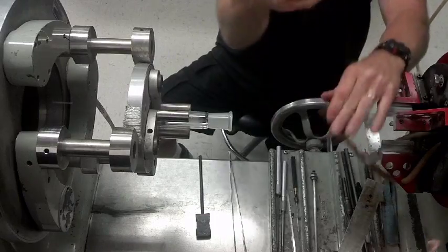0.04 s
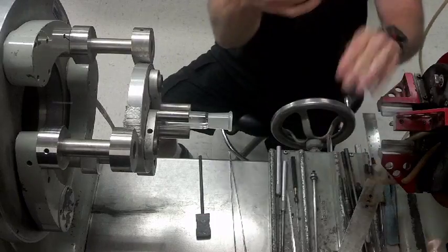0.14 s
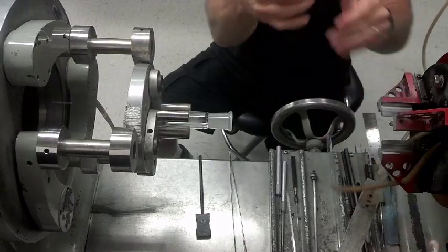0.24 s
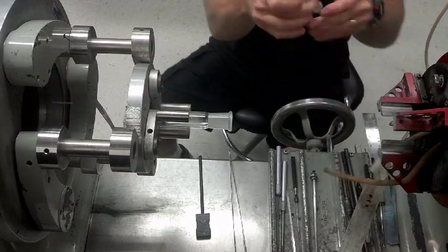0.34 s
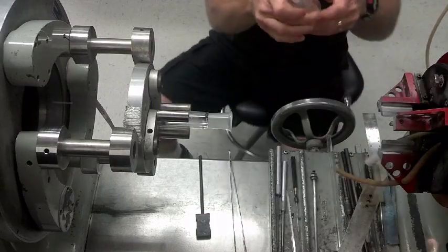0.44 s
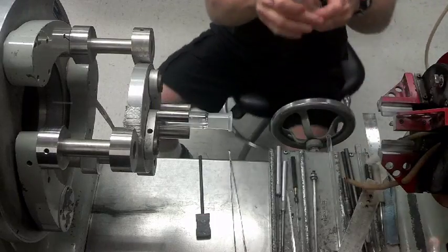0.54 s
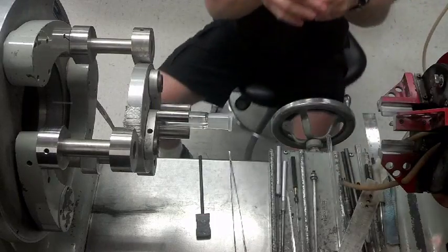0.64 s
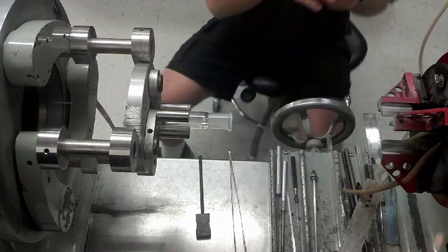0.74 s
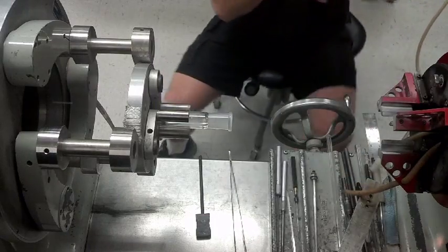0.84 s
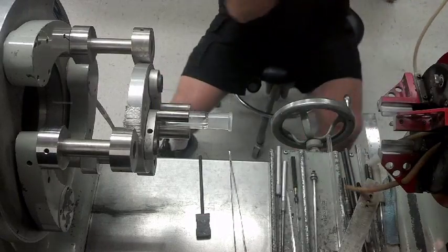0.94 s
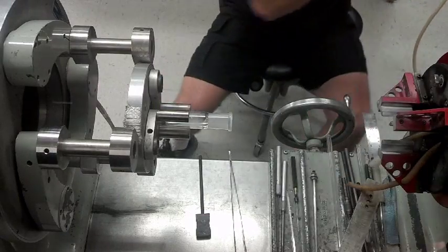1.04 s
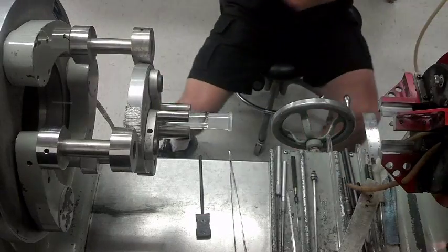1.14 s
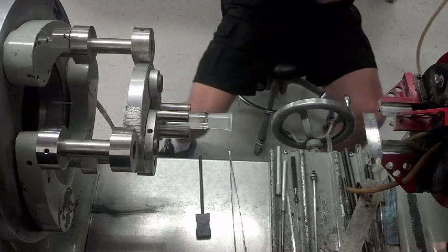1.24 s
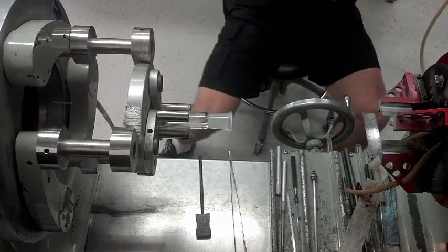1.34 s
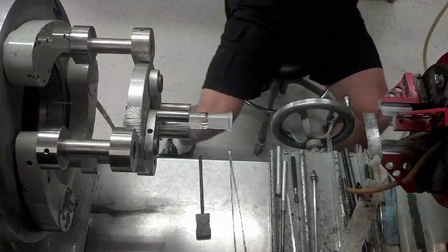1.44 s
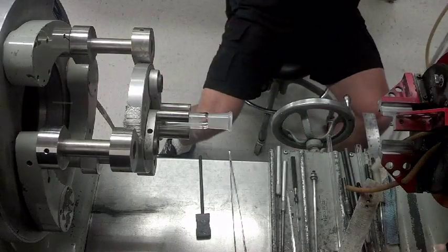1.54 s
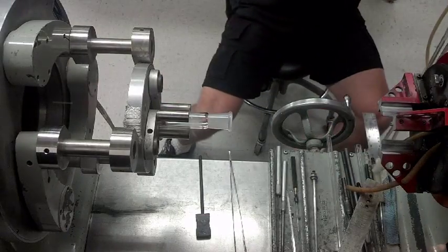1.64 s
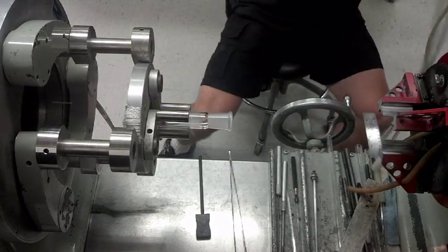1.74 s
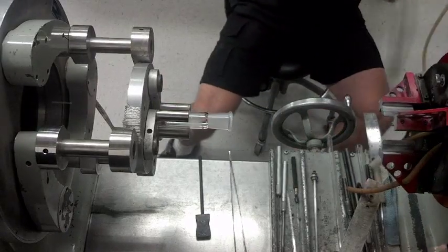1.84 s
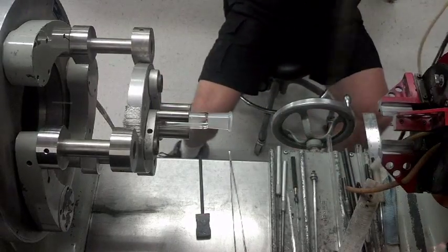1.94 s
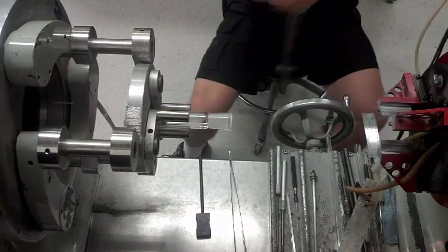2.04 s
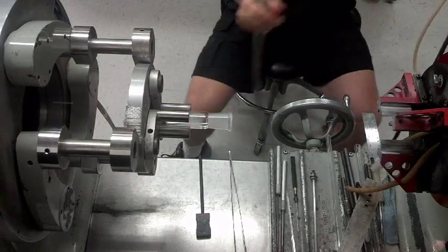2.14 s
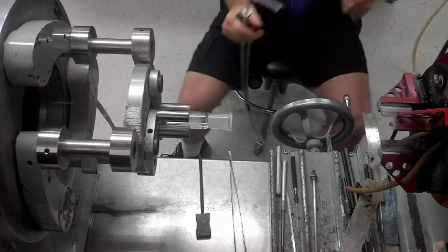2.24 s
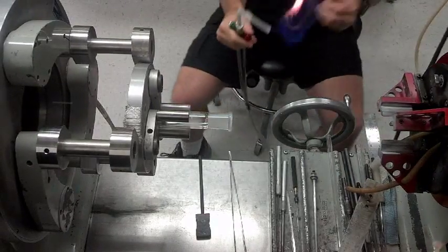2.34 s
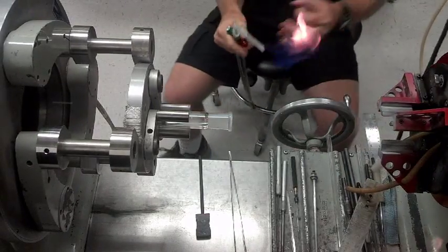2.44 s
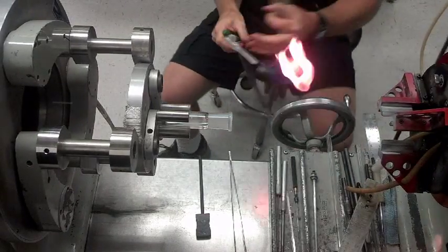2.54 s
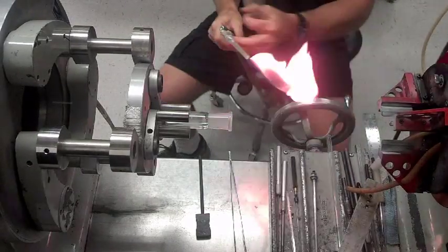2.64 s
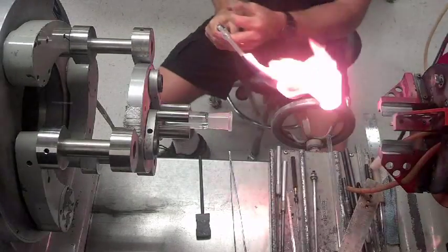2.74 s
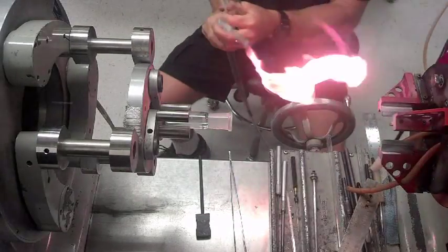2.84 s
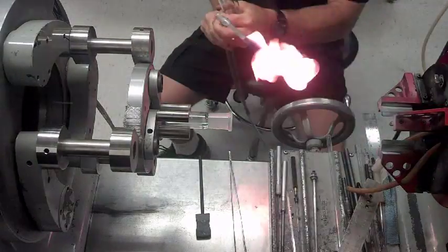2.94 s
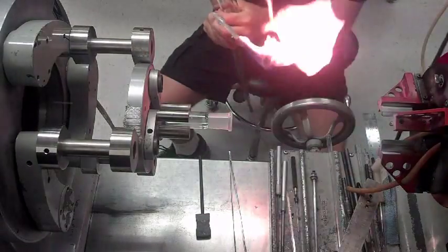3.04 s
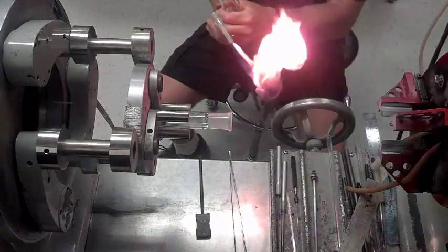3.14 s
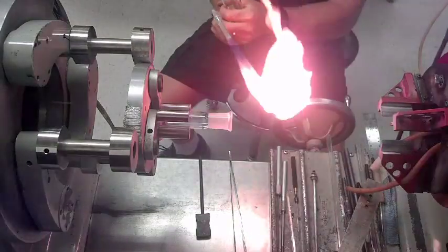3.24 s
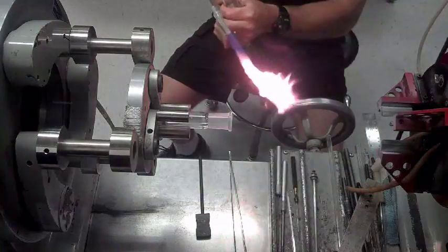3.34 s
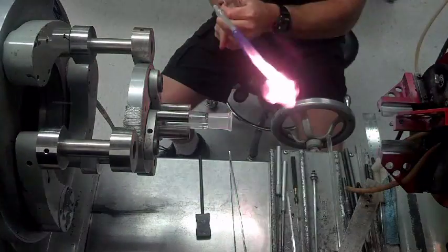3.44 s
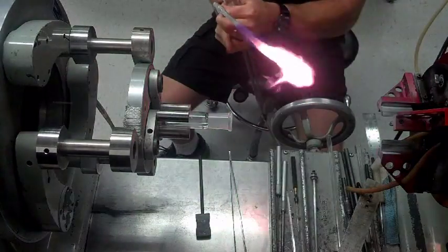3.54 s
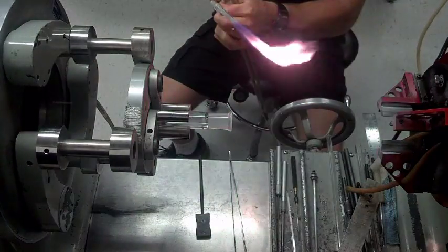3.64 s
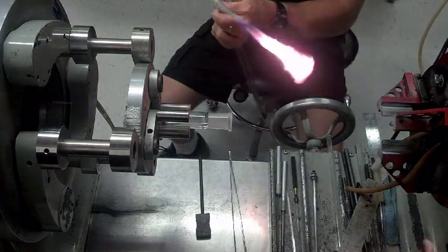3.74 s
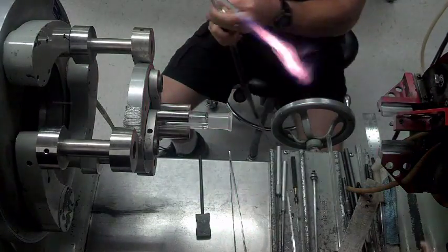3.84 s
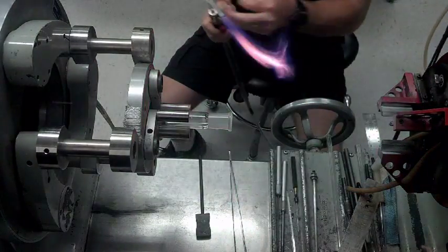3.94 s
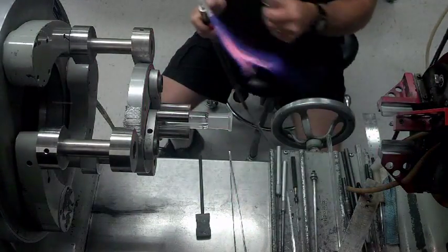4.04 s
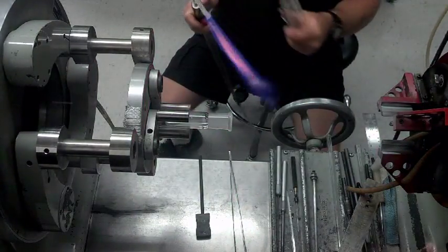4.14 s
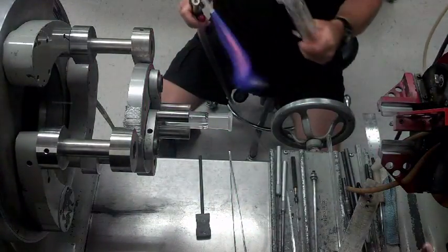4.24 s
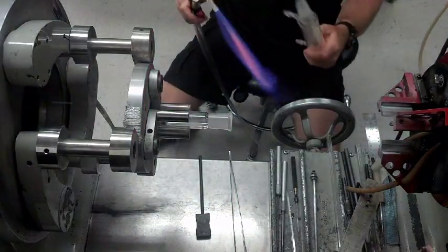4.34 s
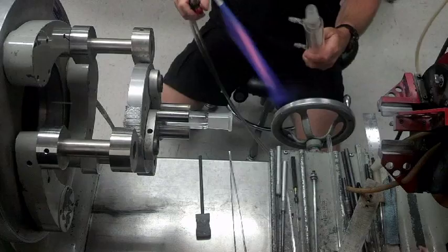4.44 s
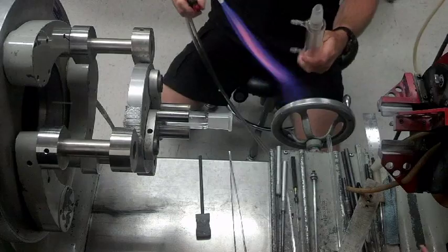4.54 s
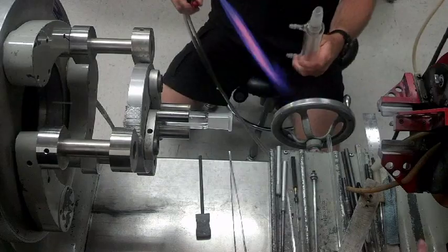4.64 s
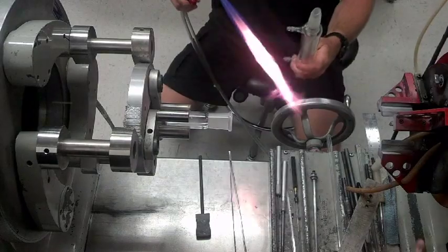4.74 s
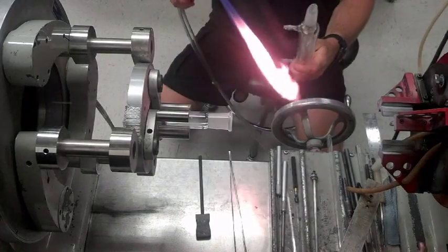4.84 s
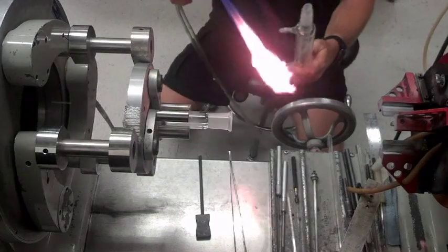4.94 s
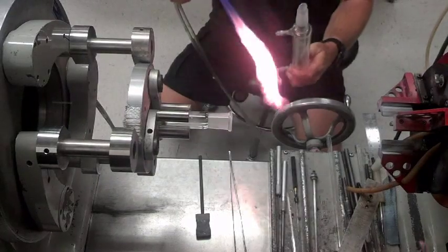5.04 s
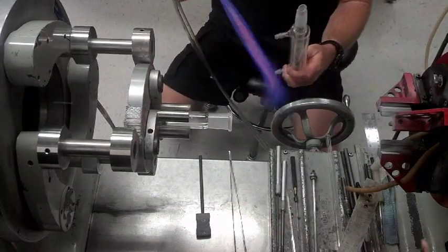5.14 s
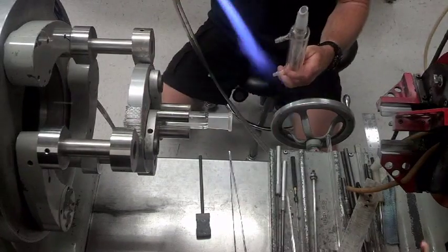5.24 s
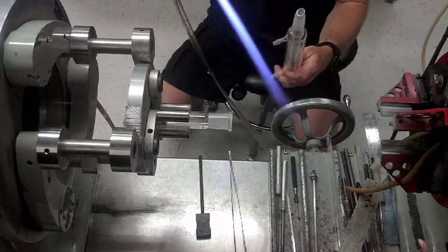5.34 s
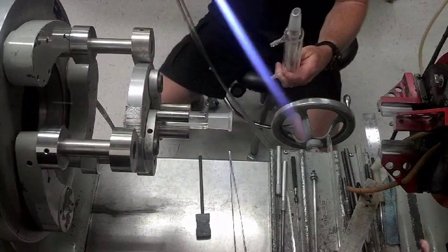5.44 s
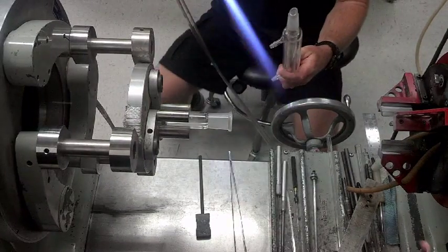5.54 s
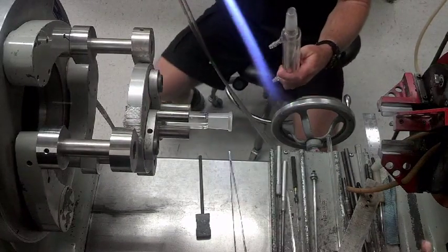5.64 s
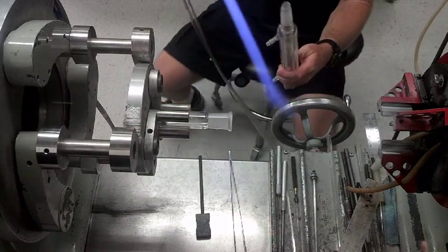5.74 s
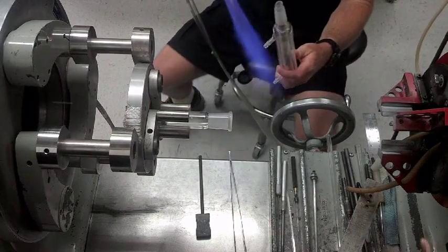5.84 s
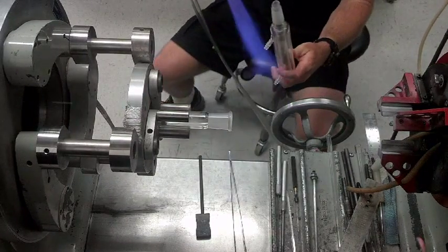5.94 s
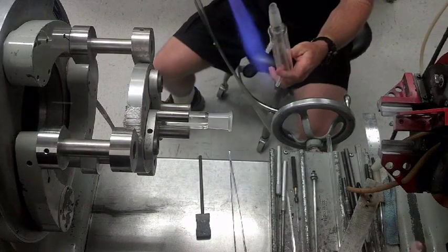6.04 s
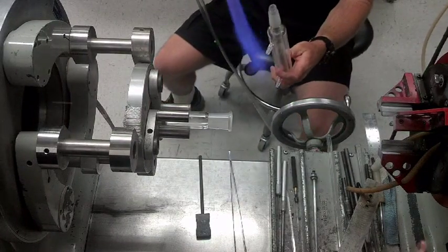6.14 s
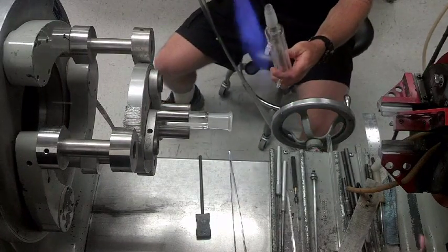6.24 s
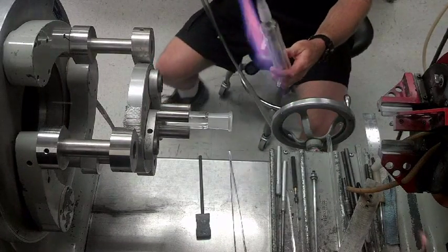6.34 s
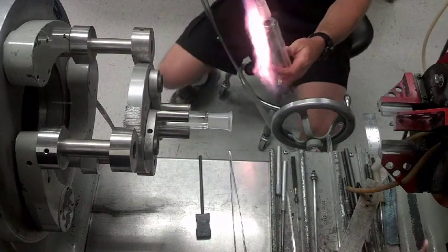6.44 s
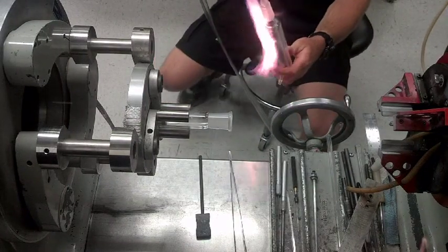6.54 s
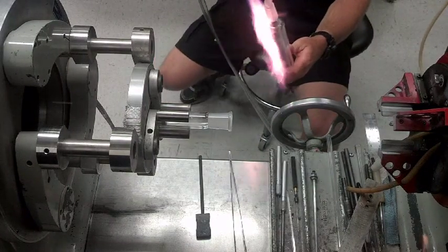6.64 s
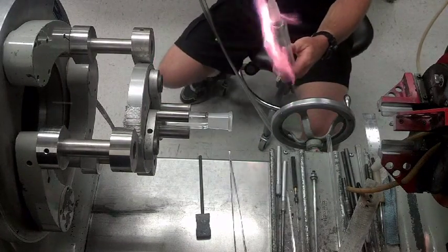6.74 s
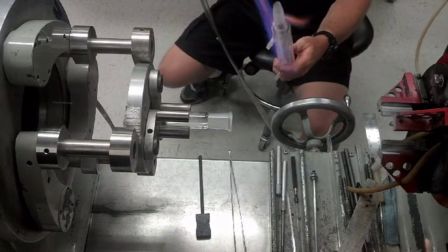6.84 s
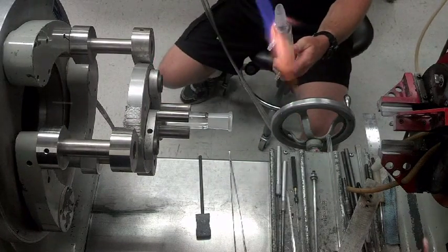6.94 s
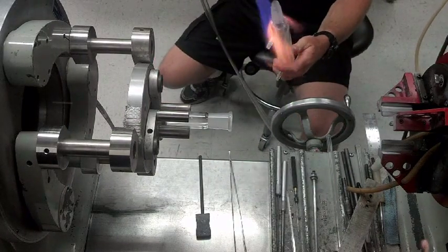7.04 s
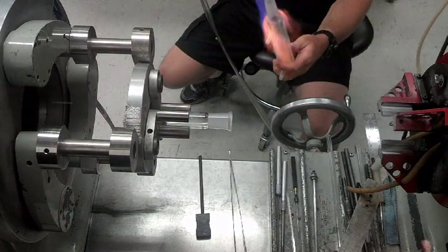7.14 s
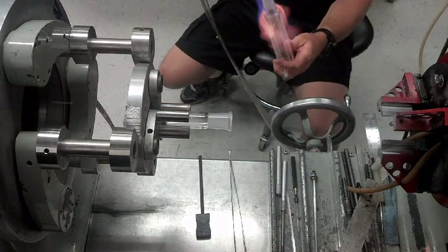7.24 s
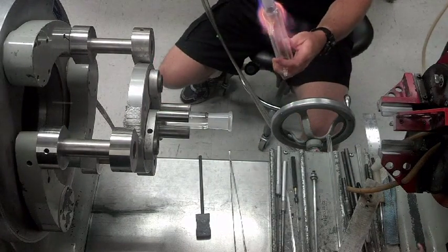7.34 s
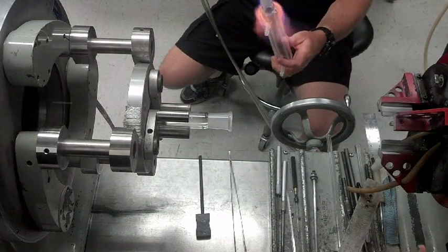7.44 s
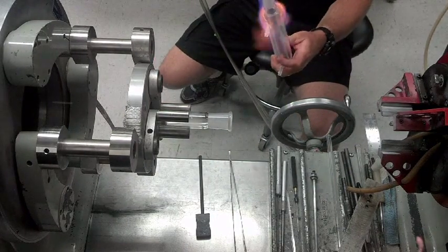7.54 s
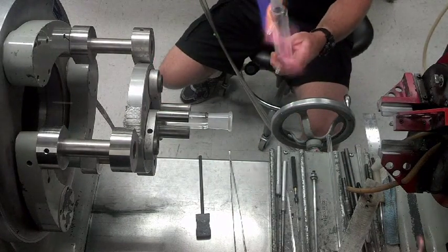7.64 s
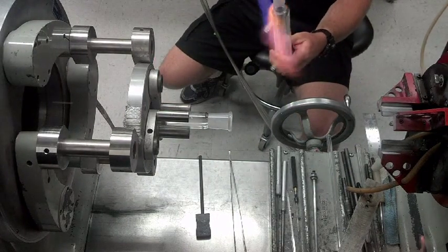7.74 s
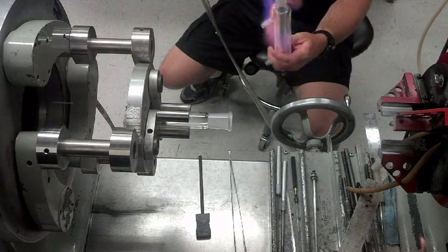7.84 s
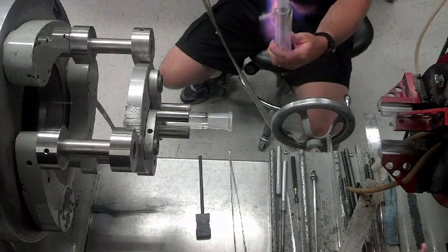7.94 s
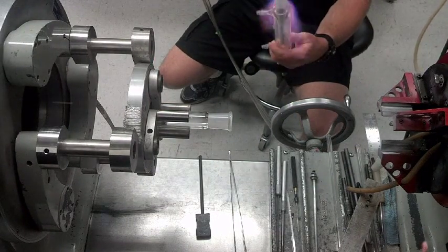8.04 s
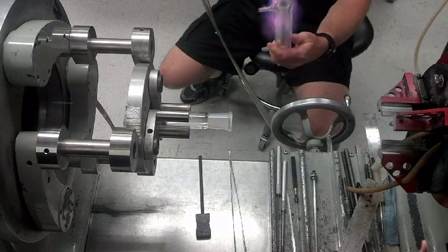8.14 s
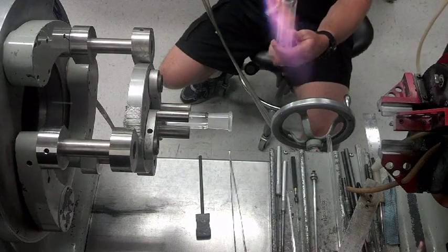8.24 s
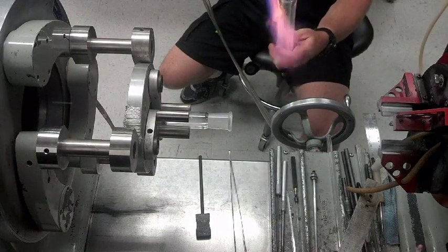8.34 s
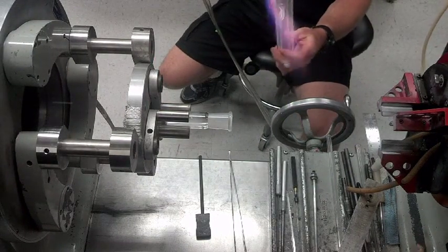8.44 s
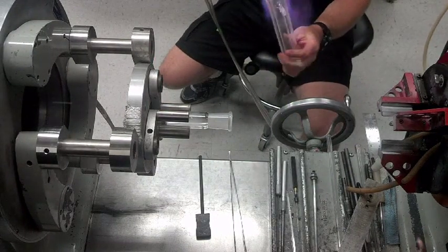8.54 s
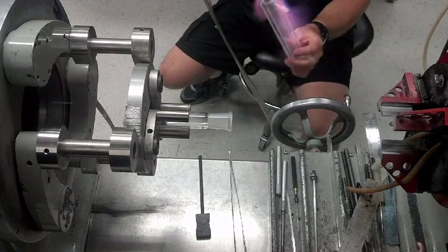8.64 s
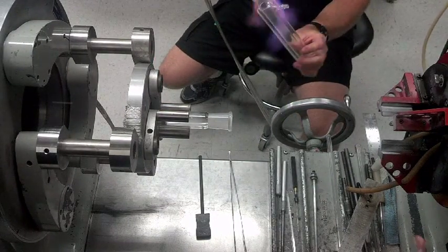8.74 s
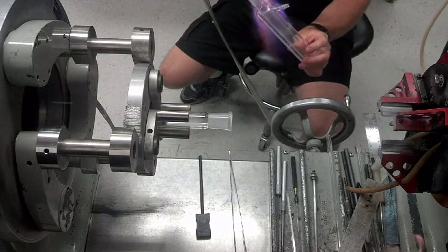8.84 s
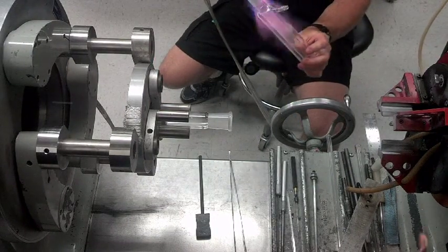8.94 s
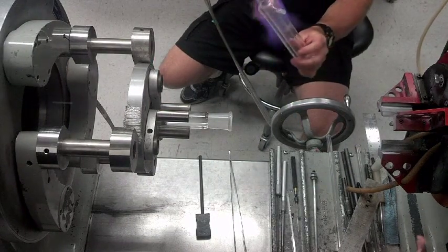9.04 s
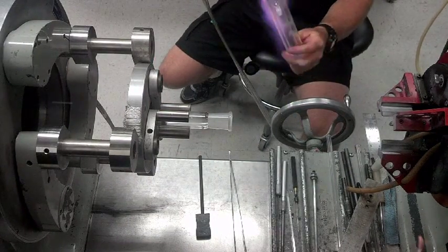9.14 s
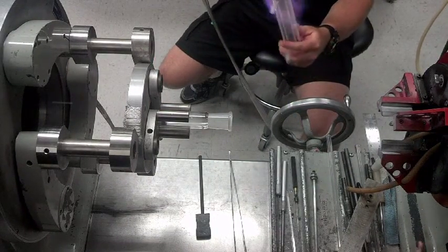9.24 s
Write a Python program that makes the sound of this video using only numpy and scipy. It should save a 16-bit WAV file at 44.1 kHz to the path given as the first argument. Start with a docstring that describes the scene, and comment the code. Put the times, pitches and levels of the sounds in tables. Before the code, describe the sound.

A hand torch hisses steadily over a humming workshop fan, spits once with three small pops, then roars unevenly against a glass tube.

```python
"""A glass workshop: a hand torch burns over a steel bench, under a running extractor fan.
Gas hisses from the nozzle: noise coloured by whistles and by echoes off metal that shift as the torch moves.
As oxygen is turned up the flame spits once, a sputter with three pops, then roars against a glass tube.
The flame is three bands of noise that follow one vigour; the fan is steady noise with duct resonances.
A hollow note sings in the air noise, and there is one soft scuff."""
import sys
import numpy as np
from scipy import signal
from scipy.fft import rfft, irfft, next_fast_len
from scipy.io import wavfile
from scipy.ndimage import uniform_filter1d

SR = 44100
rng = np.random.default_rng(int(sys.argv[2]) if len(sys.argv) > 2 else 0)


def output_pcm(signal):
    """Save a mono or channel-first signal as 16-bit PCM at the path in sys.argv[1].

    Samples are clipped to [-1, 1] before scaling.
    """
    pcm = np.clip(np.atleast_2d(signal).T, -1, 1) * 32767
    wavfile.write(sys.argv[1], SR, np.round(pcm).astype(np.int16))


N = 409248
TIME = np.arange(N) / SR
SIZE = next_fast_len(N, real=True)
HZ = np.maximum(np.arange(SIZE // 2 + 1) * SR / SIZE, 1)   # kept above zero for the logarithms


def jet():
    """Turbulent gas hisses from the nozzle, combed by close echoes; its top flutters more than its body."""
    # Spectrum of the hiss. Each row: frequency in Hz, relative density in dB per Hz.
    hiss_spectrum = [(2300, -6.0), (2750, -2.3), (3500, -3.1), (4400, -1.7), (5150, 0.0), (5800, -3.6),
                     (6400, -3.9), (7000, -1.9), (7700, -2.4), (8400, -6.0), (10000, -6.2), (11500, -10.0),
                     (12700, -7.7), (13400, -11.7)]
    # Faint whistling resonances, torch held still and then by the tube.
    # Each row: frequency in Hz, width in Hz, lift in dB.
    whistles_still = [(3525, 56, 7), (3940, 80, 4), (4290, 40, 2), (4380, 24, 0), (4550, 36, 4),
                      (4700, 50, 1), (5120, 34, 9.5), (5600, 100, 6.5), (6380, 120, 3), (6930, 120, 5.5),
                      (7500, 60, 3), (7700, 77, 6), (12700, 200, 3)]
    whistles_moved = [(3610, 50, 2), (3980, 170, 2.9), (4490, 43, 2.7), (4800, 60, 2.3), (5160, 54, 6),
                      (5220, 100, 1.9), (6080, 80, 2.9), (7050, 110, 4.2), (7650, 46, 3), (7600, 43, 3.3),
                      (8980, 200, 3.5), (12700, 200, 2.5)]
    # Stereo likeness and balance of the hiss. Each row: frequency in Hz, likeness 0-1, left-right in dB.
    hiss_stereo = [(1900, 0.8, -2), (2290, 1, -1), (2807, 0.96, -1), (3310, 0.13, -6), (4030, 0.94, 2),
                   (4900, 0.7, -5), (5540, 0.93, 1.5), (5990, 0, -1.5), (7060, 0.95, -1),
                   (8300, 0.84, -2.5), (13000, 0.4, -1)]
    # Brief dips and swells. Each row: middle in seconds, half length in seconds, change in dB.
    hiss_sways = [(0.55, .15, -1), (3.7, 0.46, -0.5), (5.552, 0.23, 1), (6.2, .13, -2), (6.7, .3, -1.1)]
    body_start_db, top_start_db, top_from_hz = -28, -33, 8520
    # the torch is held still, then moved steadily; its top beams away from the microphone as it goes
    move_start_s, move_m_per_s = 3.55, 0.0475
    body_loss_db_per_m, top_loss_db_per_m = 1.5, 5.5
    recolour_m = 0.049   # travel over which one set of whistles gives way to the other
    right_lag_s = 0.0003633

    travel = move_m_per_s * np.maximum(TIME - move_start_s, 0)
    sway_db = sum(db * bump(s, half_s) for s, half_s, db in hiss_sways)
    body_db = body_start_db + sway_db - body_loss_db_per_m * travel
    top_db = top_start_db + sway_db - top_loss_db_per_m * travel

    three = [reflections(x, travel, strength=0.22, fade_s=0.065) for x in rng.standard_normal((3, N))]
    likeness, pan_db = in_hz(hiss_stereo)
    # lag and reversed polarity (pi) hollow the summed sound at every multiple of 1 / lag
    lead = np.pi + 2 * np.pi * HZ * right_lag_s
    hiss = stereo(three, colour(hiss_spectrum, skirt_db=9.0), likeness, lead, pan_db)

    moved = np.clip(travel / recolour_m, 0, 1)
    still_hiss = filtered(hiss, lifted(whistles_still))
    moved_hiss = filtered(hiss, lifted(whistles_moved))
    hiss = (1 - moved) * still_hiss + moved * moved_hiss

    top = filtered(hiss, 1 / (1 + (top_from_hz / HZ) ** 10))
    flutter = drift(6.6)
    body = from_db(body_db + 0.76 * flutter) * rms_one(hiss - top)
    top_flutter_db = 0.52 * flutter + 0.81 * drift(24)
    return body + from_db(top_db + top_flutter_db) * rms_one(top)


def reflections(x, travel, strength, fade_s, count=15):
    """Echoes off the lathe and bench; each path stretches or shrinks as the torch moves."""
    sound_m_per_s = 343
    out = x.copy()
    for where, slant, sign in rng.random((count, 3)):
        delay = .0012 + .013 * where ** 1.5
        moved = np.cos(np.pi * slant) * travel / sound_m_per_s
        echo = np.interp(TIME - delay - moved, TIME, x)
        out += np.sign(sign - .5) * strength * np.exp(-delay / fade_s) * echo
    return rms_one(out)


def flame():
    """The burning gas rumbles, roars and rushes; all three follow its vigour and flicker together."""
    # Spectra of the three voices. Each row: frequency in Hz, relative density in dB per Hz.
    roar_spectrum = [(200, -8.5), (290, -5.5), (370, -1), (450, -6), (650, -4), (900, -12), (1100, -14.5),
                     (1400, -20), (2000, -21)]
    rush_spectrum = [(500, -8), (900, -1), (1100, 3.5), (1700, -0.5), (2600, 0.5), (4000, -17), (7000, -29)]
    rumble_spectrum = [(70, -14), (120, 1), (190, -0.5), (300, -2.5)]
    # Resonances of the space around the bench. Each row: frequency in Hz, width in Hz, lift in dB.
    bench_resonances = [(320, 16, 2.5), (348.3, 16, 6), (361, 10, -5), (382, 29, 6), (430, 22, -2.5),
                        (470, 19, 6), (489, 16, 3.5), (544, 40, 3.5), (610, 19, 6.5), (677, 17, 5),
                        (718, 13, 3), (756, 35, 7), (870, 25, 4.5), (1015, 33, 4)]
    # Vigour of the flame, of which only the departure from its mean counts. Each row: time in seconds, dB.
    vigour_curve = [(0.0, -35.5), (1.02, -35.5), (3.36, -35.5), (3.54, -34.5), (4.3, -33), (5.07, -33.5),
                    (5.14, -33), (5.64, -35), (5.74, -31), (6.66, -32), (8.99, -29), (9.2, -30.5)]
    # The flame sharpens and its tip rushes, then settles. Each row: peak in seconds, lift in dB.
    surges = [(5.75, 9), (7.0, 5)]
    # The roar swells and sags as the flame meets the tube. Each row: middle in seconds, change in dB.
    licks = [(6.0, 0.8), (6.35, 1), (6.72, 0), (6.88, 4), (7.05, 0.5), (7.37, 0.5), (7.72, -2.5),
             (7.92, 1.5), (8.27, 2), (8.58, -1.5), (8.8, 0.5), (9.1, -1.5)]
    # The flame goes soft and bushy, trading rush for rumble. Each row: middle in seconds, rumble lift in dB.
    flares = [(4.98, 2), (6.53, 13)]
    lick_s, flare_s, flare_rush_share = 0.08, 0.19, 0.93
    # each voice: level at mean vigour in dB, before events and flicker; dB gained per dB of vigour
    roar_mean_db, roar_follows = -35, 1.64
    rush_mean_db, rush_follows = -45, 1.87
    rumble_mean_db, rumble_follows = -52, 1

    vigour_db, = in_time(vigour_curve)
    vigour_db = vigour_db - vigour_db.mean()
    surge_db = sum(db * surge(s) for s, db in surges)
    lick_db = sum(db * bump(s, lick_s) for s, db in licks)
    flare_db = sum(db * bump(s, flare_s) for s, db in flares)
    roar_db = roar_mean_db + roar_follows * vigour_db + lick_db
    rush_db = rush_mean_db + rush_follows * vigour_db + surge_db - flare_rush_share * flare_db
    rumble_db = rumble_mean_db + rumble_follows * vigour_db + flare_db

    flicker_db = 0.66 * drift(27)
    eddies = from_db(1.2 * drift(83))   # uneven burning gives the roar its grain
    roar = from_db(roar_db) * low_noise(colour(roar_spectrum, bench_resonances), eddies)
    rush = from_db(rush_db) * low_noise(colour(rush_spectrum))
    rumble = from_db(rumble_db) * low_noise(colour(rumble_spectrum))
    return (rumble + roar + rush) * from_db(flicker_db)


def surge(peak_s):
    """A quick rise to 1, then a slow settling."""
    rise_s, settle_s = 0.18, 0.71
    age = TIME - peak_s
    return np.clip(1 + age / rise_s, 0, 1) * np.exp(-np.maximum(age, 0) / settle_s)


def spit():
    """The flame spits once: a bright, fluttering sputter swells to a soft crack and eases off."""
    # Spectrum of the sputter. Each row: frequency in Hz, relative density in dB per Hz.
    sputter_spectrum = [(300, -5), (600, 7), (1200, -1), (1700, 0), (2300, -2), (3000, 1.5), (4000, 1),
                        (5100, -6), (7800, -18), (10000, -24)]
    peak_s, length_s, release_s = 5.18, 0.088, 0.024
    peak_db, growth_db_per_s = -26.5, 148   # before the flutter
    crack_s, crack_half_s, crack_db = 5.176, 0.008, -25

    before = np.maximum(peak_s - TIME, 0)
    after = np.maximum(TIME - peak_s, 0)
    growth = from_db(peak_db - growth_db_per_s * before) * (before < length_s)
    sputter = growth * np.exp(-after / release_s) * from_db(2.5 * drift(120))
    strength = sputter + from_db(crack_db) * bump(crack_s, crack_half_s)
    # the noise comes back at rms 1, so the strength's own rms is restored
    return np.sqrt(np.mean(strength ** 2)) * low_noise(colour(sputter_spectrum), strength)


def pops():
    """Pockets of gas go off, each a short knock of a cycle or two with no bass, alike in both channels."""
    # Pops within the spit. Each row: start in seconds, level in dB before the decay and the low cut.
    pop_times = [(5.094, -16), (5.122, -17), (5.179, -16)]
    pop_hz, decay_s, low_cut_hz = 600, 0.0014, 310
    out = np.zeros(N)
    for s, db in pop_times:
        age = np.clip(TIME - s, 0, 1)
        out += from_db(db) * np.sin(2 * np.pi * pop_hz * age) * np.exp(-age / decay_s)
    low_cut = signal.butter(2, low_cut_hz, "high", fs=SR, output="sos")
    return signal.sosfilt(low_cut, out + 1e-18)


def hollow_note():
    """Two close, narrow resonances hold an even note in the air noise, swelling now and then."""
    # The two resonances. Each row: frequency in Hz, width in Hz, relative level in dB.
    note_peaks = [(476, 14, -0.5), (515.2, 9.9, -0.5)]
    # Swells of the note. Each row: middle in seconds, half length in seconds, lift in dB.
    note_swells = [(1.032, 0.15, 8), (1.87, 0.2, 9.5), (2.524, 0.059, 11), (2.997, 0.093, 8),
                   (3.67, 0.28, 8.5), (4.26, 0.11, 2), (4.95, 0.15, 6), (5.38, 0.15, 10)]
    steady_db, even_s = -46.5, 0.16   # level between swells; time over which strength is evened out
    gain = sum(from_db(db) / (1 + (2 * (HZ - hz) / width) ** 2) for hz, width, db in note_peaks)
    note = low_noise(gain)
    power = uniform_filter1d(np.mean(note ** 2, axis=0), int(even_s * SR))
    swell_db = sum(db * bump(s, half_s) for s, half_s, db in note_swells)
    return from_db(steady_db + swell_db) * note / np.sqrt(power)


def scuff():
    """A short, soft rub of noise under the hiss, probably the stool rolling."""
    # Spectrum of the rub. Each row: frequency in Hz, relative density in dB per Hz.
    scuff_spectrum = [(600, 0), (850, -16), (1040, -8), (1170, 0), (1270, -14)]
    middle_s, half_s, peak_db = 1.36, 0.069, -35
    return from_db(peak_db) * bump(middle_s, half_s) * low_noise(colour(scuff_spectrum, skirt_db=30))


def fan():
    """The extractor drives steady air noise through its resonant duct."""
    # Spectrum of the air noise. Each row: frequency in Hz, relative density in dB per Hz.
    fan_spectrum = [(25, -11), (45, -16), (70, -4.5), (110, -3), (170, -4), (280, -8.5), (400, -6.5),
                    (520, -1), (750, -1.5), (1100, -4), (1600, -13)]
    # Resonances of the duct. Each row: frequency in Hz, width in Hz, lift in dB.
    duct_resonances = [(127, 9.5, 2.5), (158, 14, 4), (186, 12, 4.5), (238.7, 28, 8), (379, 20, 6),
                       (406, 25, 4.5), (477, 30, 3.5), (516, 12, 5), (603, 16, -7), (630, 21, 3.5),
                       (665, 20, 3), (935, 23, -7), (972, 12, 3.5), (1080, 23, 1), (1130, 30, -3.5),
                       (1310, 30, -3.5)]
    level_db = -33   # before the gaps are cut
    return from_db(level_db) * low_noise(colour(fan_spectrum, duct_resonances, skirt_db=24))


def low_noise(gain, strength=1):
    """Turbulence of a given strength, spread in stereo around the bench; rms 1."""
    # Stereo likeness, lead and balance of all but the hiss and pops.
    # Each row: frequency in Hz, likeness 0-1, left lead in radians, left-right in dB.
    low_stereo = [(35, 0.5, -3.5, -1), (70, 0.98, -3, 2), (107.3, 0.98, -3, 5), (186, 0.24, 0.5, 9),
                  (235, 0.23, 0, 0.5), (300, 0.79, -1.5, -2.5), (365, 0.89, -1, 1), (580, 0.63, 0.5, -2),
                  (980, 0.78, 0.48, -2), (1370, 1, -0.6, 0.5), (1900, 0.56, 1.5, -5.5),
                  (2580, 0.96, 3, 3.5), (4160, 0.82, 6, -5)]
    return stereo(rng.standard_normal((3, N)) * strength, gain, *in_hz(low_stereo))


def stereo(three, gain, likeness, lead, pan_db):
    """One sound common to both channels and one of each channel's own, coloured; rms 1."""
    share = np.clip(likeness, 0, .998)
    common, *own = rfft(three, SIZE)
    pair = np.sqrt(share) * common + np.sqrt(1 - share) * np.array(own)
    pair[0] *= np.exp(1j * lead)
    balance = from_db([pan_db / 2, -pan_db / 2])
    return rms_one(irfft(pair * gain * balance, SIZE)[:, :N])


def with_gaps(pair):
    """Deep narrow gaps are cut in the sum and the difference of the two channels."""
    # The gaps. Each row: frequency in Hz, width in Hz, depth in dB.
    sum_gaps = [(2698, 269, 30.5), (5540, 150, 6)]
    difference_gaps = [(4000, 300, 12)]
    mid = filtered((pair[0] + pair[1]) / 2, gaps(sum_gaps))
    side = filtered((pair[0] - pair[1]) / 2, gaps(difference_gaps))
    return np.array([mid + side, mid - side])


def gaps(rows):
    """Gain of narrow, steep-sided gaps."""
    return from_db(-sum(db / (1 + abs(2 * (HZ - hz) / width) ** 4) for hz, width, db in rows))


def lifted(resonances):
    """Gain of a set of resonances, each a bell in dB."""
    return from_db(sum(db / (1 + (2 * (HZ - hz) / width) ** 2) for hz, width, db in resonances))


def colour(spectrum, resonances=(), skirt_db=18):
    """Gain of a spectrum that falls by skirt_db per octave beyond its ends, shaped by each resonance."""
    octaves_out = abs(np.log2(HZ / np.clip(HZ, spectrum[0][0], spectrum[-1][0])))
    return from_db(in_hz(spectrum)[0] - skirt_db * octaves_out) * lifted(resonances)


def filtered(x, gain):
    """Apply a gain over frequency."""
    return irfft(rfft(x, SIZE) * gain, SIZE)[..., :N]


def drift(rate_hz):
    """Random wandering with rms 1, weakening above the given rate."""
    return rms_one(filtered(rng.standard_normal(N), 1 / (1 + (HZ / rate_hz) ** 2)))


def bump(middle_s, half_s):
    """A smooth rise and fall of height 1."""
    return np.exp(-((TIME - middle_s) / half_s) ** 2)


def in_time(rows):
    """Each column of a curve, joined by straight lines."""
    s, *columns = np.transpose(rows)
    return [np.interp(TIME, s, c) for c in columns]


def in_hz(rows):
    """Each column of a table, joined on a log-frequency axis."""
    hz, *columns = np.transpose(rows)
    return [np.interp(np.log(HZ), np.log(hz), c) for c in columns]


def from_db(db):
    """Amplitude of a level in dB."""
    return 10 ** (np.asarray(db) / 20)


def rms_one(x):
    """Scale to an rms of 1."""
    return x / np.sqrt(np.mean(x ** 2) + 1e-20)


def scene():
    """Torch and fan have narrow gaps in their sum and difference; spit, pops, note and scuff lie on top."""
    return with_gaps(jet() + flame() + fan()) + spit() + pops() + hollow_note() + scuff()


def record(dry):
    """The top is cut steeply."""
    cutoff_hz = 13620
    return filtered(dry, 1 / np.sqrt(1 + (HZ / cutoff_hz) ** 600))


dry = scene()
out = record(dry)
output_pcm(out)
```